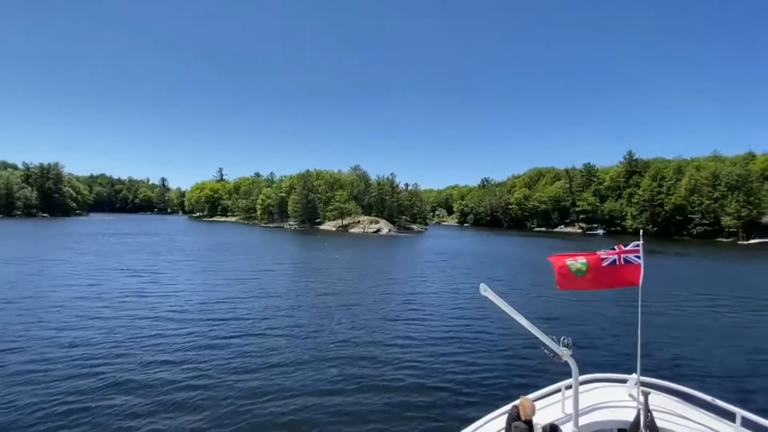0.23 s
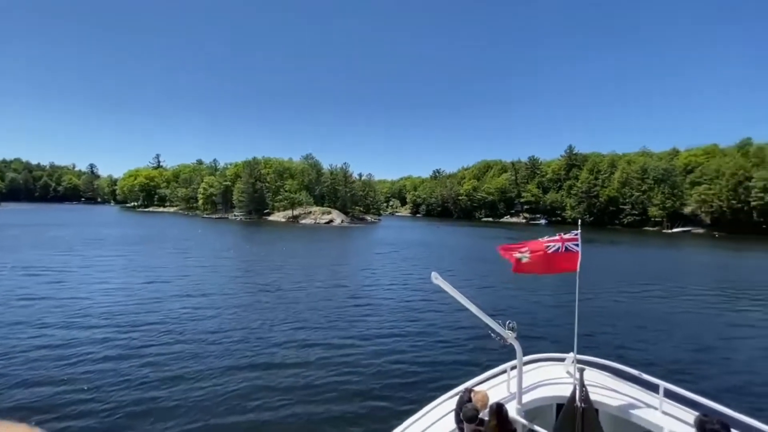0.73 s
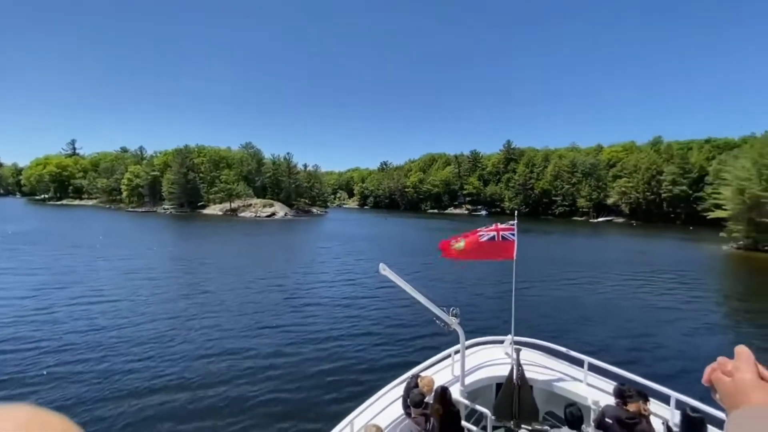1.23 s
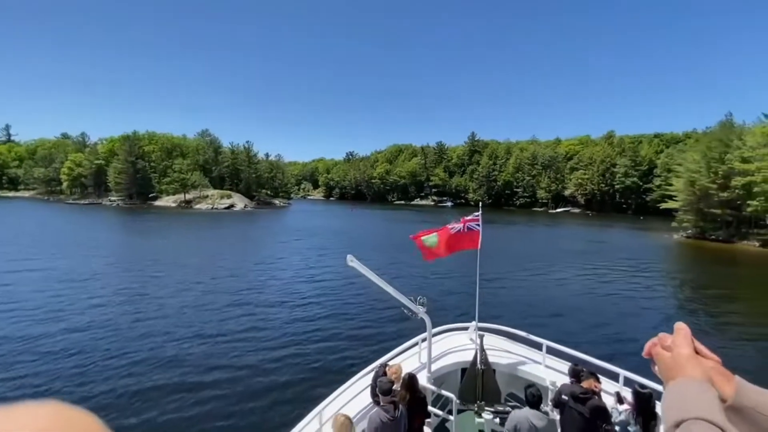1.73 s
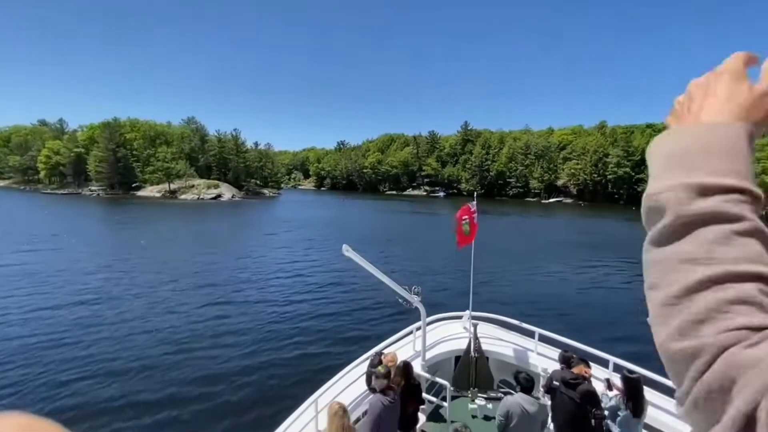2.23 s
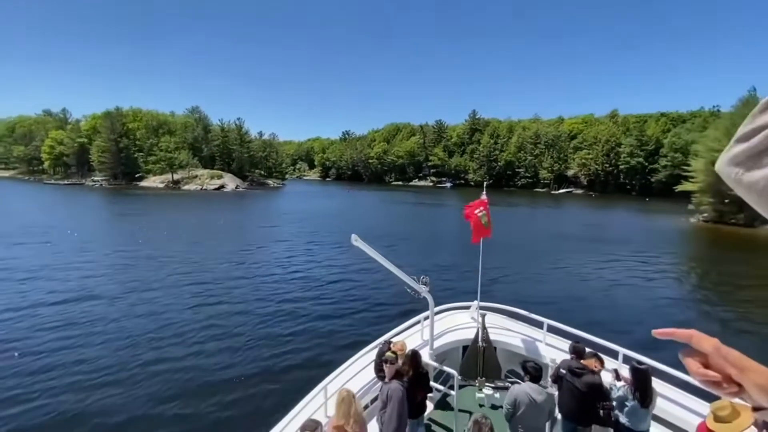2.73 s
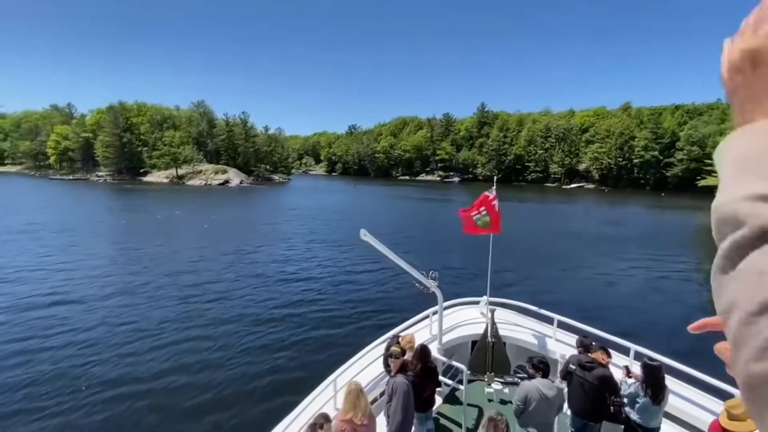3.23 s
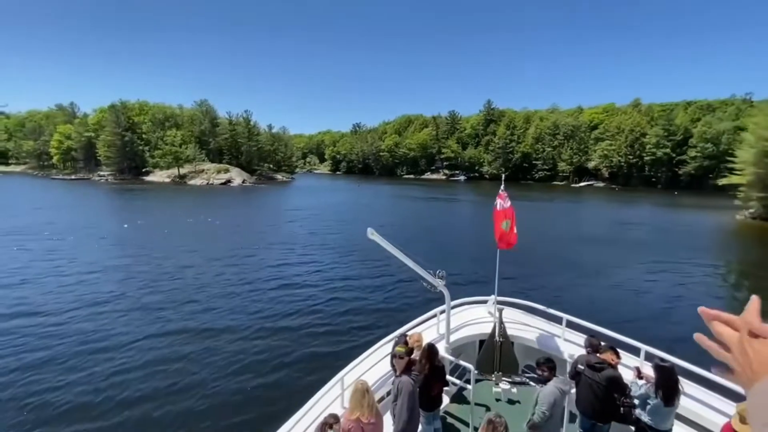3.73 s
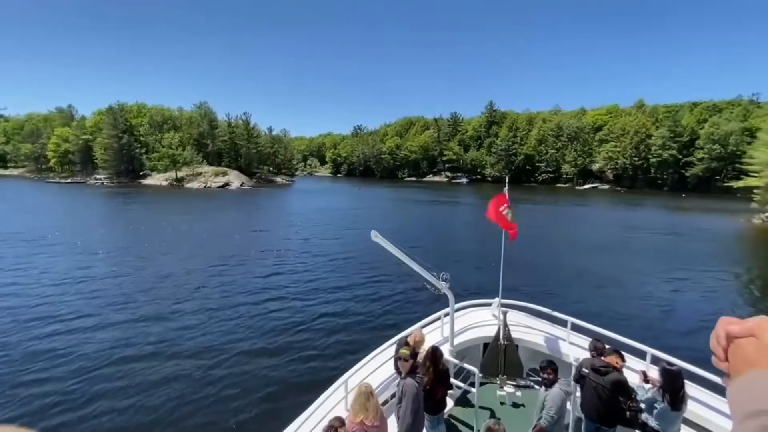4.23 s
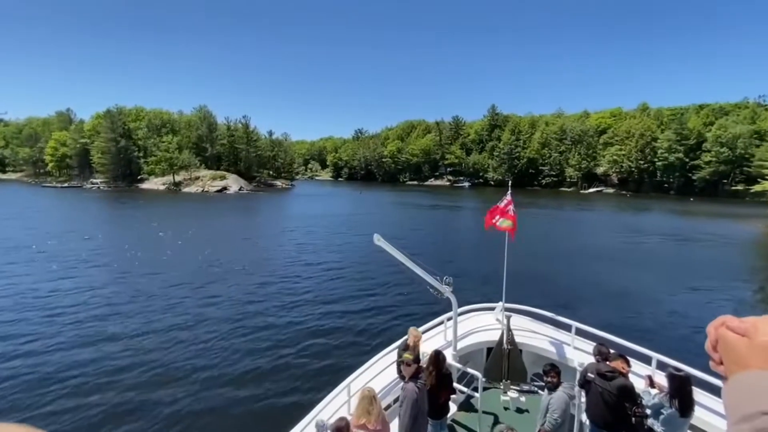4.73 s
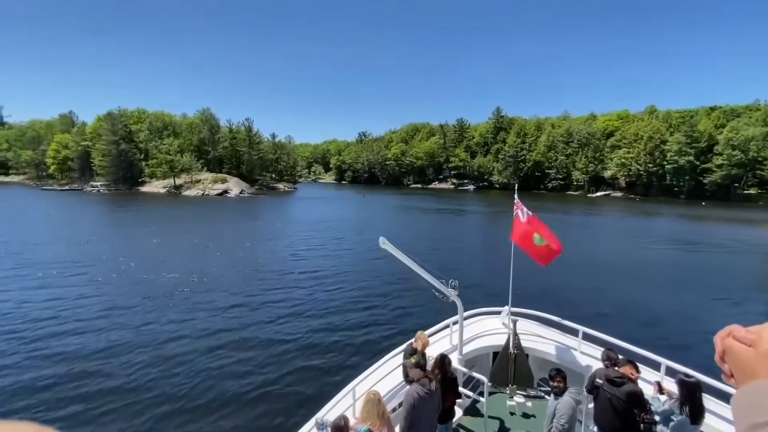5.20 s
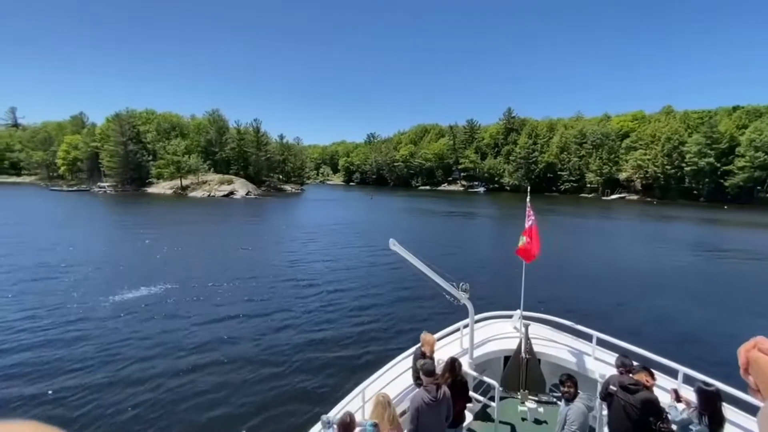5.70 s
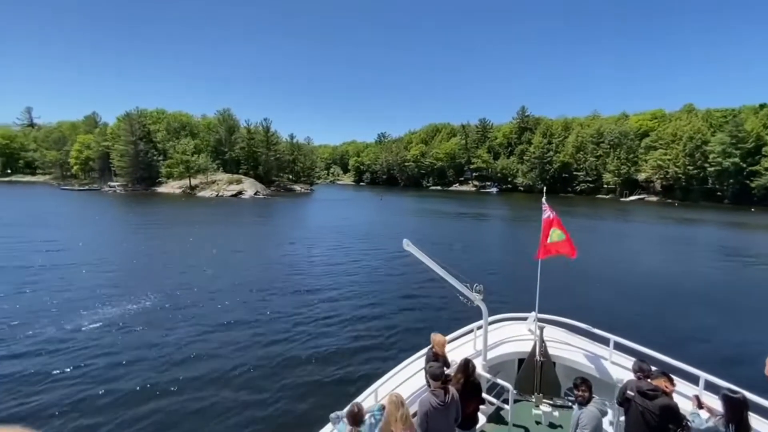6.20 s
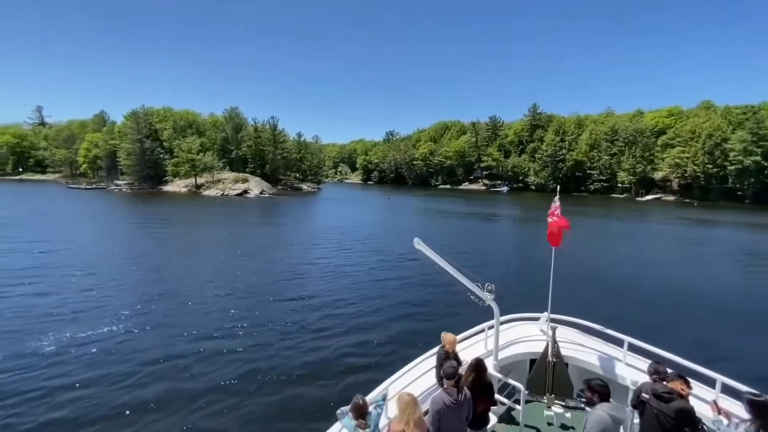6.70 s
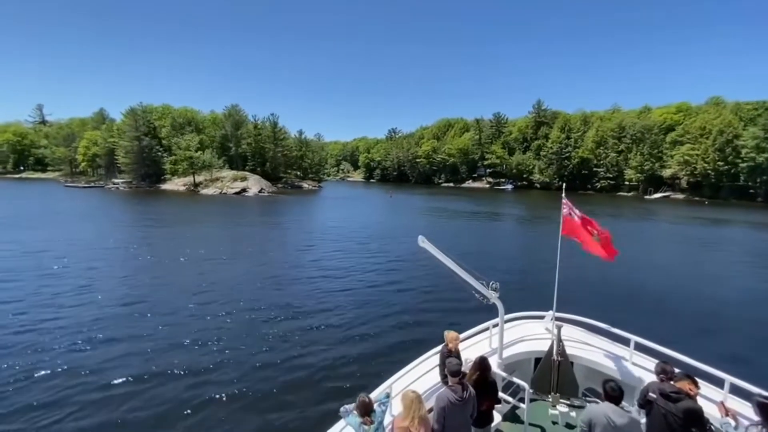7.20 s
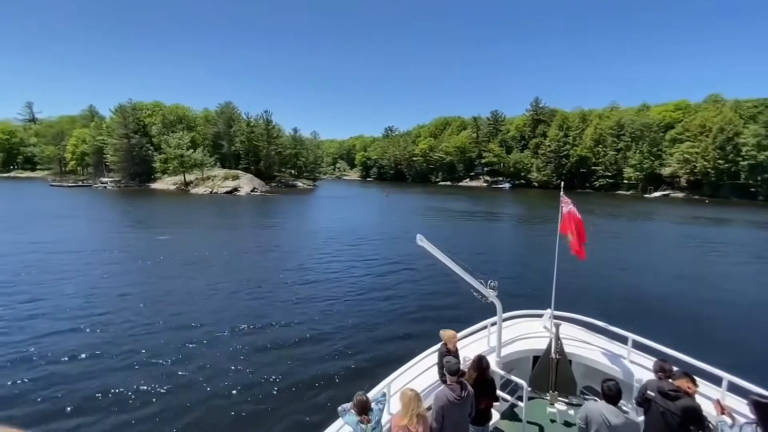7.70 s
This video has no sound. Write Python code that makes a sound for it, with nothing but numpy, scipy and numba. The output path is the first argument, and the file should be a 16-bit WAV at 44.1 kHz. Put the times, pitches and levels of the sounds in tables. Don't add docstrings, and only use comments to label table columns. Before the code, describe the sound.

One unbroken brassy ship horn chord blares across a lake deck, air rushing through it, while wind thumps the microphone and fingers tap its case.

```python
import sys
import numpy as np
from scipy import signal
from scipy.fft import rfft, irfft, next_fast_len
from scipy.io import wavfile
from scipy.ndimage import uniform_filter1d, map_coordinates
from numba import njit

SR = 44100
rng = np.random.default_rng(int(sys.argv[2]) if len(sys.argv) > 2 else 0)


def decibels_to_gain(level_db):
    exponent = np.asarray(level_db, float) / 20
    return 10 ** exponent


def store_wav(level_fs):
    pcm = np.round(np.clip(np.atleast_2d(level_fs), -1, 1) * 32767)
    wavfile.write(sys.argv[1], SR, pcm.T.astype(np.int16))


N = 350595
STEP = 256
DROP_S, DROP_SAMPLES = 7.4885, 1024
USUAL_LAG = 1.4


def rms_one(x):
    return x / np.sqrt(np.mean(x ** 2) + 1e-20)


def coarse(rows):
    s, *columns = np.transpose(rows)
    grid_s = np.arange(N // STEP + 2) * STEP / SR
    return [np.interp(grid_s, s, c) for c in columns]


def fine(slow):
    return np.interp(np.arange(N) / STEP, np.arange(len(slow)), slow)


def at_hz(points, hz):
    f, db = np.transpose(points)
    return np.interp(np.log(hz), np.log(f), db)


def drift(rate, count):
    r = np.exp(-2 * np.pi * rate * STEP / SR)
    white = rng.standard_normal((count, N // STEP + 302))
    slow = signal.lfilter([1], [1, -2 * r, r * r], white)[:, 300:]
    return slow / slow.std(axis=1, keepdims=True)


def bandpass(order, low_hz, high_hz, x):
    return signal.sosfilt(signal.butter(order, [low_hz, high_hz], "band", fs=SR, output="sos"), x)


# t/s, swing, tilt, treble left over right level/dB
TURN = [(0, 1.76, 1.3, 8), (.4, -0.11, 2.5, 11), (1.3, 1.06, 0.9, 6), (1.9, 1.3, -0.55, 2),
        (2.5, -0.15, -0.66, 5), (3.4, -0.064, -0.5, 5), (3.7, -0.03, -0.5, 5.5), (5.2, -.2, -0.44, 4),
        (5.5, -1.5, 1.1, 3.5), (5.8, -0.42, 0.7, 5), (6.7, -2.16, 0.9, 4), (7.95, -1.3, 1.2, 3.5)]


def turning():
    return coarse(TURN)


# t/s, delay/samples
LAG = [(0, -8), (.85, -.4), (1.95, 4.1), (2.3, 3), (4.5, 2.2), (5.9, 1.2), (7.1, -.4), (7.95, 0)]


def left_lag():
    return coarse(LAG)[0]


def treble_db(hz, waver):
    share = np.clip(np.log2(hz / 1430.0) / 1.37, 0, 1)
    swing, _, pan_db = turning()
    level_db = 1.5 + 2.5 * swing + 1.0 * waver
    return share * (level_db + .5 * (pan_db - 3.5) * [[1], [-1]])


# t/s, level/dB
BREEZE = [(0, -62), (2.0, -67), (2.7, -56), (3.5, -58.5), (4.2, -58.5), (4.65, -49), (4.85, -66),
          (6.0, -69), (7.0, -56.5), (7.1, -68.5), (7.95, -72.5)]
# t/s, peak level/dB, length/s, left over right level/dB
GUSTS = [(.02, -52, .03, -8), (.2, -58, .08, 2), (.66, -54, 0.17, 0), (1.09, -57, .07, 9),
         (1.24, -60, .04, 11), (1.37, -59, 0.055, 9), (1.525, -48, 0.025, 9), (1.658, -50, .03, 16),
         (1.83, -56, 0.05, -1), (2.085, -50, 0.049, 4), (2.27, -53, 0.039, 4), (2.557, -48, .04, 10),
         (2.652, -47, .04, 13), (2.897, -52, 0.1, 1), (3.25, -51, 0.046, -1), (3.93, -54, 0.047, 18),
         (4.05, -57, 0.046, 9), (4.23, -60, .04, -4), (4.38, -46, .035, 0.5), (5.63, -60, .05, 10),
         (5.91, -53, 0.071, -1), (6.19, -60, .035, -1), (6.37, -61, .06, 7), (6.954, -56, 0.041, 1),
         (7.94, -56, .02, -4)]


def wind():
    t, sides = np.arange(N // STEP + 2) * STEP / SR, np.array([[.5], [-.5]])
    breeze_db, = coarse(BREEZE)
    power = decibels_to_gain(2 * (breeze_db + 2.5 * sides))
    for s, db, length, pan_db in GUSTS:
        width = length * np.where(t < s, 0.64, 1)
        power = power + decibels_to_gain(2 * (db + pan_db * sides)) * np.exp(-((t - s) / width) ** 2)
    white = rng.standard_normal((2, N))
    white[1] -= 0.16 * white[0]
    rumble = rms_one(bandpass(3, 45, 140, white))
    spill = rms_one(bandpass(2, 110, 420, white))
    spill_gain = fine(decibels_to_gain(3.5 + 0.41 * (breeze_db - breeze_db.mean())))
    lumps = np.sqrt(power) * decibels_to_gain(3.0 + 3.5 * drift(7.1, count=2))
    return (rumble + spill_gain * spill) * np.array([fine(g) for g in lumps])


# t/s, peak level/dB
TICKS = [
    (0.414, -26),
    (1.67, -33),
    (2.2466, -15.5),
    (3.2065, -20),
    (3.7304, -24),
]


def ticks():
    out, after = np.zeros((2, N)), np.arange(1200) / SR
    for s, db in TICKS:
        start = round(s * SR)
        fade = decibels_to_gain(db - 15.5 - 60 * after / 0.022)
        out[:, start:start + len(after)] += fade * rng.standard_normal((2, len(after)))
    return bandpass(2, 3500, 10000, out + 1e-18)


# f/Hz, level/dB per Hz
RUSH = [(150, -12.5), (250, -6.5), (600, -5.5), (950, -4.5), (2700, -13), (2950, -20), (8000, -24),
        (11000, -42)]


def rush(low_phase, waver):
    size = next_fast_len(N)
    hz = np.arange(1, size // 2 + 2) * SR / size
    mid, side = rfft(rng.standard_normal((2, size))) * decibels_to_gain(at_hz(RUSH, hz))
    alike = np.clip(.5 + 0.037 * np.log2(hz / 500), 0, .95)
    ports = np.sqrt(1 + alike) * mid + np.sqrt(1 - alike) * side * [[1], [-1]]
    puff = rms_one(np.exp(0.62 * np.cos(low_phase - .3)))
    edges = [100, 700, 1500, 2800, 4500, 6500, 12000]
    out, flicker = 0, drift(6.8, count=len(edges))
    for low, high, own in zip(edges, edges[1:], flicker):
        centre = np.sqrt(low * high)
        gated = np.clip(2.1 * np.log2(centre / 1000), 0, 1)
        gain_db = treble_db(centre, waver) + 1.2 * own + 1.2 * flicker[-1]
        gain = np.array([fine(g) for g in decibels_to_gain(gain_db)])
        band = irfft(ports * ((hz >= low) & (hz < high)), size)[:, :N]
        out = out + gain * (1 - gated + gated * puff) * band
    out[0] = map_coordinates(out[0], [np.arange(N) - fine(left_lag())], order=3)
    return decibels_to_gain(-37) * rms_one(out)


def dapple(x):
    hz, s, lines = signal.stft(x, SR, nperseg=2048)
    fades = drift(.8, count=3 * 64).reshape(3, 64, -1)[:, :, ::4]
    fades = .8 * fades[0] + .6 * fades[1:]
    fades = fades[:, (hz / 180).astype(int) % 64]
    fades = np.pad(fades, [(0, 0), (0, 0), (0, len(s))], "edge")[:, :, :len(s)]
    gain = decibels_to_gain(3.0 * fades * (hz > 1400)[:, None])
    return signal.istft(lines * gain, SR, nperseg=2048)[1][:, :N]


def paths(hz, level_db, lead, waver):
    slow, quick = drift(1.39, count=6), drift(28.0, count=2)
    scatter = min(.05 * (hz / 200) ** .5, .22)
    shared = slow[4] + 1j * slow[5] + 0.81 * (quick[0] + 1j * quick[1])
    rays = 1 + scatter * (0.9 * (slow[:2] + 1j * slow[2:4]) + 0.78 * shared)
    lead = lead - 2 * np.pi * hz * (left_lag() - USUAL_LAG) / SR
    smear = rng.normal(0, 0.15 + 510.0 / hz)
    turn = np.exp(1j * (smear + .5 * lead * [[1], [-1]]))
    return decibels_to_gain(level_db + 3 + treble_db(hz, waver)) * rays * turn


@njit
def overtone_sum(plain, pushed, first_pushed, gains, step):
    out = np.zeros((2, len(plain)))
    for i in range(len(plain)):
        j, share, wave = i // step, i % step / step, 1 + 0j
        for k in range(gains.shape[1]):
            wave *= plain[i] if k < first_pushed else pushed[i]
            for port in range(2):
                gain = gains[j, k, port] * (1 - share) + gains[j + 1, k, port] * share
                out[port, i] += (wave * gain).real
    return out


SUM_ORDERS = [(1, 1, 0), (0, 1, 1), (2, 1, 0), (1, 2, 0), (1, 0, 2), (0, 1, 2), (2, 2, 0), (3, 0, 1),
              (3, 2, 0), (3, 0, 2), (4, 2, 0), (4, 0, 2), (6, 0, 2)]
# left level/dB, right level/dB
SUM_DB = [(-53, -49.5), (-65, -54), (-59.5, -65.5), (-62, -66.5), (-57.5, -54.5), (-54, -62), (-44, -46.5),
          (-52, -49.5), (-51, -55.5), (-52, -54), (-51, -54.5), (-56.5, -56), (-61.5, -63)]


def sum_tones(phases, pitches, waver):
    out = 0
    for orders, db in zip(SUM_ORDERS, SUM_DB):
        wave = np.exp(1j * np.dot(orders, phases))
        gains = paths(np.dot(orders, pitches), np.array(db)[:, None], 0, waver)
        out = out + overtone_sum(wave, wave, 1, np.ascontiguousarray(gains.T[:, None]), STEP)
    return out


START_HZ = [211.26, 268.61, 328.11]
CREEP_HZ_PER_S = [.056, .022, .175]


def cycles():
    t = np.arange(N) / SR
    settle_hz, settle_s = [.15, .14, .15], .8
    hz = np.c_[START_HZ] + np.c_[settle_hz] * (1 - np.exp(-t / settle_s)) + np.c_[CREEP_HZ_PER_S] * t
    pitches = hz.mean(axis=1)
    hz = hz + 0.1477 * np.array([fine(d) for d in drift(4.0, count=3)])
    leap = hz * DROP_SAMPLES * (np.arange(N) == round(DROP_S * SR))
    return 2 * np.pi * (np.cumsum(hz + leap, axis=1) / SR + rng.random((3, 1))), pitches


def pushes(phases):
    low, middle, high = phases
    by_low = .04 * np.sin(3 * low)
    by_middle = .015 * np.sin(middle) + .055 * np.sin(2 * middle)
    by_high = .015 * np.sin(high) + .03 * np.sin(2 * high)
    return by_middle + by_high, by_low + by_high, by_low + by_middle


# f/Hz, level/dB
UPPER = [(2000, -62), (4000, -66.5), (5200, -62.5), (6800, -64), (8500, -73), (11000, -92)]


def trumpet(phase, push, hz, overtones, shifts, upper_db, reach_hz, waver):
    swing, tilt, _ = turning()
    gains = []
    for k in range(1, int(reach_hz / hz)):
        if k <= len(shifts):
            shift = np.c_[list(shifts[k - 1])]
        else:
            shift = np.c_[2.06 * rng.standard_normal(4)]
        if k <= len(overtones):
            *level_db, lead = overtones[k - 1]
            level_db = np.c_[level_db]
        else:
            level_db = at_hz(UPPER, k * hz) + upper_db + np.array([[.6], [-1.5]]) + rng.normal(0, 4.4)
            lead = rng.normal(0, .4) - 2 * np.pi * k * hz * USUAL_LAG / SR
        level_db = level_db + shift[:2] * swing + shift[2:] * tilt
        gains.append(paths(k * hz, level_db + 0.077 * max(k - 5, 0), lead, waver))
    gains = np.ascontiguousarray(np.transpose(gains, (2, 0, 1)))
    return overtone_sum(np.exp(1j * phase), np.exp(1j * (phase + push)), 5, gains, STEP)


# left level/dB, right level/dB, left lead/rad
LOW = [(-34, -33, 0.24), (-39.5, -41.5, 0.0056), (-26, -42.5, -0.54), (-36, -30.5, 0.32), (-31, -36, 0.7),
       (-39, -38.5, -0.75), (-39.5, -39, -0.32), (-43.5, -46.5, -0.14), (-42.5, -41, -0.21),
       (-49, -54.5, -0.81), (-47, -44, -0.87), (-44.5, -46, -.5), (-54.5, -53, 0.47), (-67.5, -58.5, -0.71),
       (-57.5, -57, -0.83), (-62, -56, -2.8), (-67, -68, 0.41), (-58.5, -62.5, -1.0), (-59.5, -67, -1.8),
       (-60, -56.5, 0.073), (-62.5, -58.5, -0.29), (-62, -69.5, -1.3), (-63.5, -72, -3.1),
       (-61, -75.5, 0.32), (-61, -61, -0.74), (-63, -63.5, -0.74), (-63.5, -67.5, -0.79), (-67, -68, -1.2),
       (-65.5, -66, -0.49), (-62, -67.5, -1.9)]
MIDDLE = [(-32, -31.5, -0.34), (-33.5, -25.5, -1.5), (-34, -30.5, -0.9), (-37.5, -36.5, -0.5),
          (-37.5, -43.5, -1.2), (-43.5, -49.5, 2.8), (-44.5, -44.5, -0.9), (-55, -68, 4.5),
          (-59, -64, -0.5), (-55, -57, 1), (-61, -63, -1), (-71, -59, -4.5)]
HIGH = [(-32, -29.5, 0.41), (-30, -43, -1.2), (-36, -34.5, -0.34), (-40, -42.5, -0.41), (-63.5, -55.5, .4),
        (-70.5, -77, .1)]
# left, right level/dB per swing, left, right level/dB per tilt
LOW_SHIFT = [(.4, 0.3, -0.4, -0.2), (-4, -5, -1, -2.7), (0.36, 1.5, 0, 1), (0, 2.5, 1.7, 0.5),
             (1.6, 0.5, -1.5, 2.9), (1.8, 0.2, 0.5, 0.5), (1.5, 0, 0.7, 0), (-0.7, 0, -1, 3.3),
             (0.5, 0.1, -0.9, -0.2), (-4.5, 2.5, -6.5, 6.5), (-0.5, 1, -1, -2), (1.5, -1.5, -1.4, 1)]
MIDDLE_SHIFT = [(0.2, 1.0, 0.15, 0), (-1, -0.0022, -6.5, -2.2), (2, 0.031, 1.6, 0.1), (0.2, 2.1, 2.9, -1.4),
                (0, 1.2, -0.7, -0.5), (-1, -4.6, 2, -3), (1.7, 0.1, 0.5, -1.2)]
HIGH_SHIFT = [(1, 0.81, -.5, 0.37), (1.3, 1, -0.042, -0.15), (1.4, 2.9, -0.25, 0.5), (0.74, 3.2, 1.8, .5)]
UPPER_TRUMPET_DB = [-1.7, 0, -6.5]
REACH_HZ = [8800, 5500, 4500]


def chord(phases, pitches, waver):
    overtones, shifts = (LOW, MIDDLE, HIGH), (LOW_SHIFT, MIDDLE_SHIFT, HIGH_SHIFT)
    return sum(map(trumpet, phases, pushes(phases), pitches, overtones, shifts,
                   UPPER_TRUMPET_DB, REACH_HZ, [waver] * len(phases)))


def scene():
    (phases, pitches), waver = cycles(), drift(11.0, count=1)[0]
    air = dapple(rush(phases[0], waver))
    horn = chord(phases, pitches, waver) + sum_tones(phases, pitches, waver) + air
    horn = signal.sosfilt(signal.butter(4, 150, "high", fs=SR, output="sos"), horn)
    return wind() + ticks() + horn


def band_power(pair, bands):
    starts = np.flatnonzero(np.diff(bands, prepend=-1))
    power = np.add.reduceat(abs(pair) ** 2, starts, axis=1)
    return uniform_filter1d(power, size=3, axis=2)[:, bands] / 16


def thrifty_stereo(x):
    weaker_db, faint_db, masked_db, top_db = -6.5, -5, -15, [-82, -89]
    hz, _, ports = signal.stft(x, SR, nperseg=2048)
    pair = np.array([ports[0] + ports[1], ports[0] - ports[1]]) / 2
    bands = (hz / 345).astype(int)
    power = band_power(pair, bands)
    floor_db = np.where(hz < 2760, masked_db, faint_db)[:, None]
    stronger = power > power[::-1] * decibels_to_gain(2 * weaker_db)
    keep = stronger & (abs(pair) ** 2 > power.max(axis=0) * decibels_to_gain(2 * floor_db))
    masked = (abs(pair) ** 2 < power * decibels_to_gain(2 * masked_db)) & (hz > 690)[:, None]
    mid, side = pair * np.where((hz < 2400)[:, None], ~masked, keep)
    own = band_power(ports, bands)
    loud_band = own > decibels_to_gain(2 * np.reshape(top_db, (2, 1, 1)))
    apart = ports * loud_band * (abs(ports) ** 2 > own * decibels_to_gain(2 * faint_db))
    both = np.where((hz > 8625)[:, None], apart, [mid + side, mid - side])
    return signal.istft(both * (hz < 11330)[:, None], SR, nperseg=2048)[1][:, :N]


def low_pass(x):
    return signal.sosfilt(signal.butter(12, 16000, fs=SR, output="sos"), x)


def record(dry):
    click = decibels_to_gain(-27) * (np.arange(N) == round(DROP_S * SR))
    return low_pass(thrifty_stereo(dry) + click)


dry = scene()
out = record(dry)
store_wav(out)
```